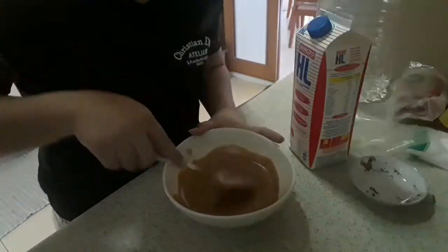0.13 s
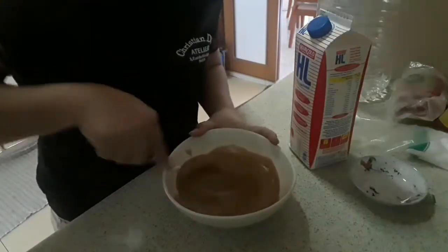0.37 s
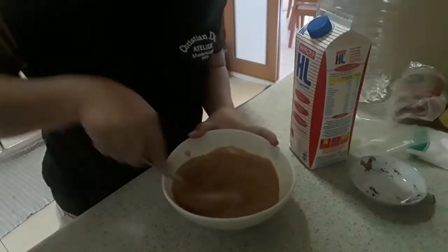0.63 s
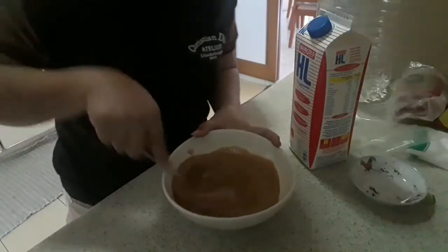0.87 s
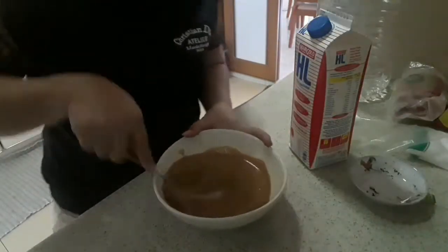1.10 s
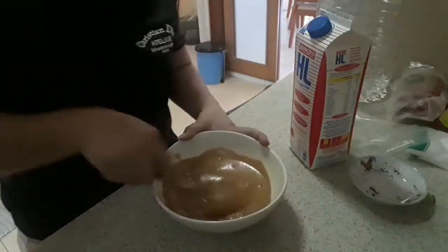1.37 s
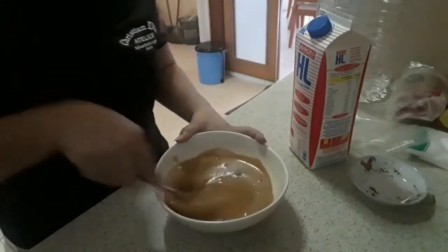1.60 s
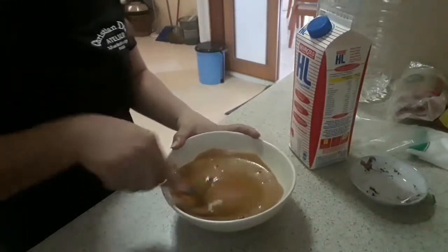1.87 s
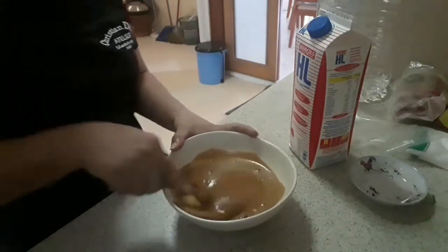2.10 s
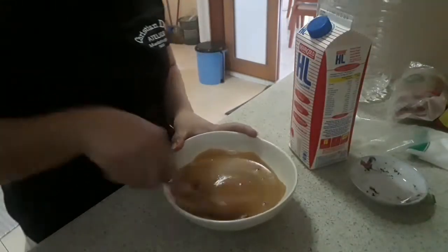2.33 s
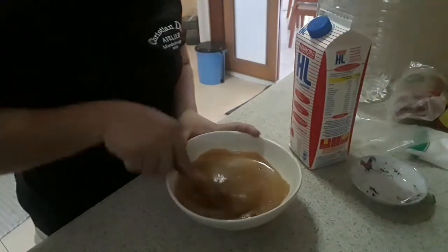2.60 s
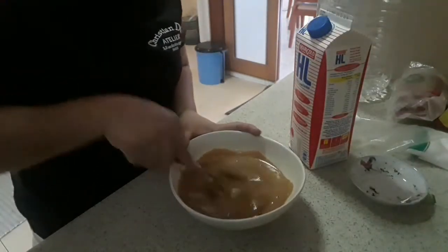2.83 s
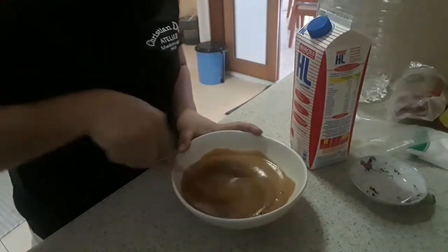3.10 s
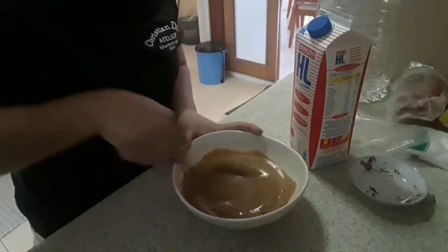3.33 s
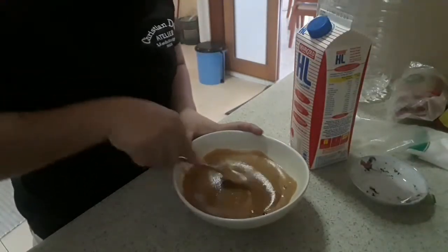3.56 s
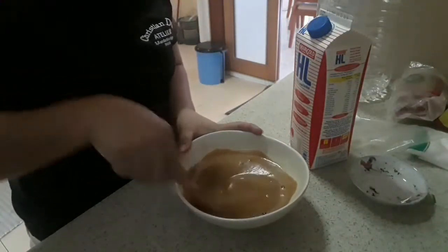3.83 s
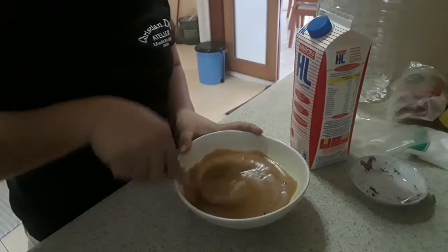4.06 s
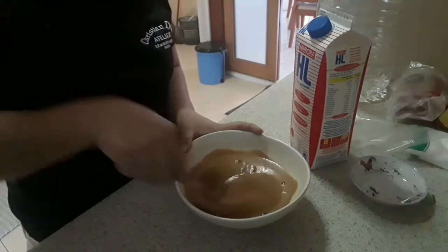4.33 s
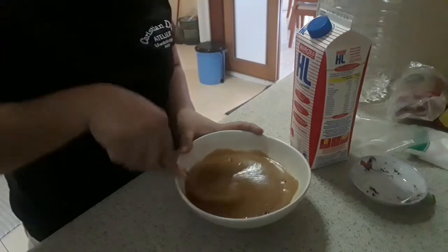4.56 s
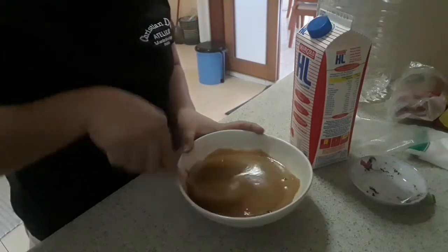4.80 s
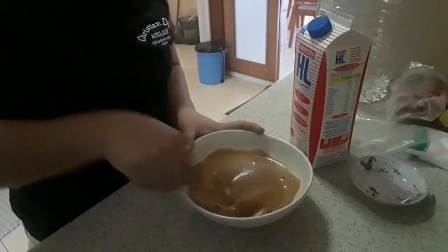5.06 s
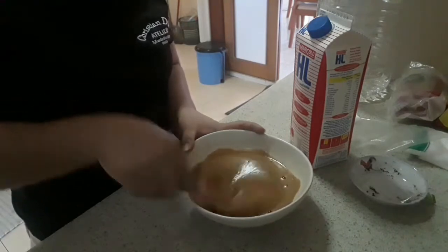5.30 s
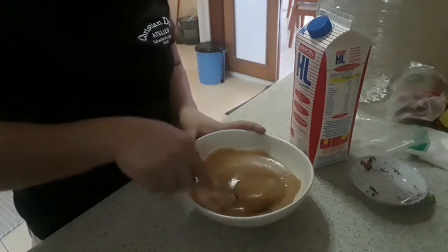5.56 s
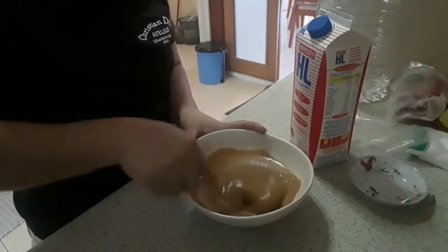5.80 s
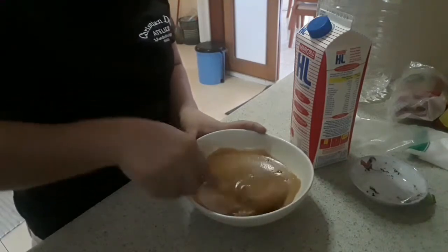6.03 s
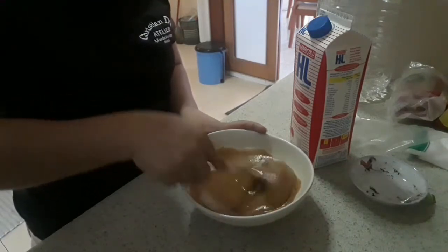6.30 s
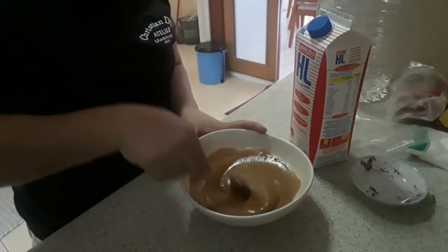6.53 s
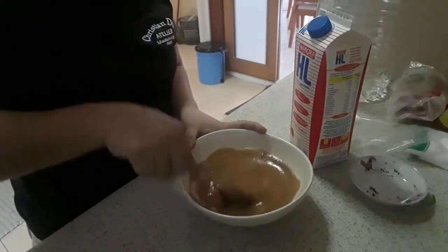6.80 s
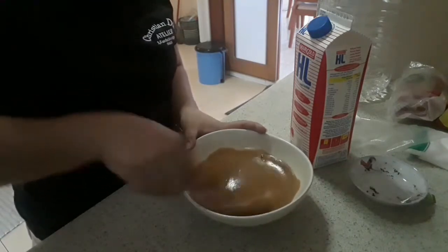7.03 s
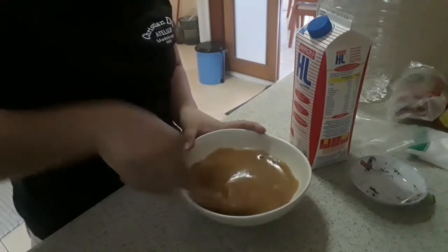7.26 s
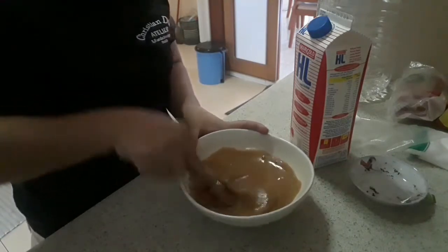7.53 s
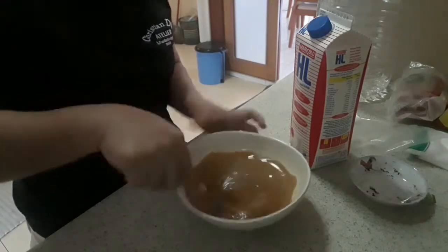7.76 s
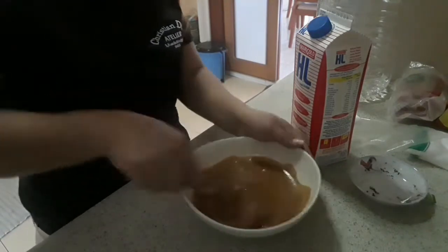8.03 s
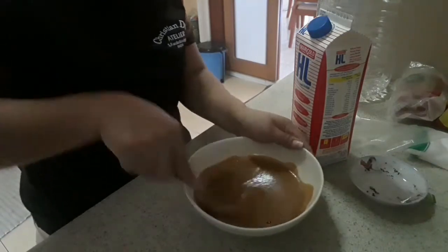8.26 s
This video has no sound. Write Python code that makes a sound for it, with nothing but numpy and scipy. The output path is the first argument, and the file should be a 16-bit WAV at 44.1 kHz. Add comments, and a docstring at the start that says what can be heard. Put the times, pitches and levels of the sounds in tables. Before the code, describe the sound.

After a short opening clatter, a spoon briskly scrapes and knocks around a ceramic bowl of batter, with a few harder clacks among soft wet turns.

```python
"""Beating batter in a ceramic bowl

Kitchen counter, one microphone, room echo 12 dB under the direct sound, treble ending near 15.5 kHz.
A metal spoon scrapes about two short strokes along the glaze in each turn, then thumps the bowl;
now and then bare metal clinks on the rim. Blows and gritty friction drive one set of damped modes,
and shaped noise adds dry cracks and the wash of batter. An opening clatter fades before the beating."""
import sys
import numpy as np
from scipy import signal
from scipy.io import wavfile
from scipy.ndimage import uniform_filter1d

SR = 44100
rng = np.random.default_rng(int(sys.argv[2]) if len(sys.argv) > 2 else 0)


def materialize(psi):
    """Save the field psi as 16-bit PCM at rate SR to the path in sys.argv[1].

    A 1-D psi becomes a single channel; in a 2-D psi each row is a channel.
    """
    bounded = np.clip(np.atleast_2d(psi).T, -1, 1)
    quanta = np.round(bounded * 32767).astype(np.int16)
    wavfile.write(sys.argv[1], SR, quanta)


def decibels_to_gain(level_db):
    """Convert a level in decibels to a linear amplitude gain (20 dB per decade)."""
    exponent = np.asarray(level_db, float) / 20
    return 10 ** exponent


N = 369905  # length in samples

# ring of bowl, spoon and counter: pitch_hz, width_hz, thump_db, stroke_db, clink_db (level under each contact)
RING_MODES = [(86, 110, -37, -32, -50), (164, 16.6, -9, -8, -42), (231.2, 27.5, 4.5, -9.5, -18),
              (316, 67, 4.5, -50, -35), (546, 29, -5.5, -31, -21), (592, 79, -5, -31, -4),
              (814, 103, 3.5, -45, -27), (979, 107, 3, -49, -11.5), (1176, 77, -4, -48, -6.5),
              (1426, 20, -11, -14, -26), (1470, 90, -8.5, -2.5, -9), (1627, 117, 0, -8, -34),
              (1957, 144, -0.5, -13, -15), (2224, 196, -9, -2, -44), (2388, 160, -2.5, -0.5, -5),
              (2740, 76, -7, -8.5, -12.5), (3056, 53, -16, -8, -15), (3514, 170, -13, -2.5, -10),
              (4400, 950, -53, -11.5, -3.5), (4820, 164, -16, -3.5, -5.5), (5370, 1360, -53, -4.5, -63),
              (6024, 440, -52, -6.5, -2.5), (6720, 330, 1.5, -13.5, -10.5), (7400, 270, -20, -15.5, -59),
              (7610, 110, -40, -20.5, -50), (7780, 86, -36, -15, -50), (8180, 69, -40, -18, -50),
              (8330, 67, -40, -27.5, -50), (7950, 300, -12, -21.5, -25), (9500, 160, -42, -48, -63),
              (9830, 630, -47.5, -22, -7.5), (12250, 960, -50, -17, -14), (13900, 1000, -55, -56, -13),
              (15770, 810, -55, -14, -20)]
# turns of the spoon, each ending in a thump through the batter: time_s, level_db, hardness_db (over 900 Hz)
SPOON_TURNS = [(0.266, -31, -16), (0.353, -27, -40), (0.474, -34.5, -28), (0.606, -34, -15),
               (0.716, -37.5, -7.5), (0.846, -39, -20), (0.94, -12.5, -10), (1.046, -45, -6),
               (1.192, -57.5, -6), (1.314, -50, 1), (1.415, -34.5, -16), (1.519, -36.5, -3),
               (1.67, -50, -18), (1.792, -50, -5), (1.914, -35, -26), (2.012, -32, -10), (2.126, -35.5, -7),
               (2.2712, -12.5, -3), (2.403, -25.5, -11), (2.528, -37, -19), (2.641, -38, -6),
               (2.752, -32, -27), (2.851, -36, -20.5), (2.975, -33, -16), (3.102, -35, -28),
               (3.215, -26, -3), (3.332, -22.5, -1), (3.442, -34.5, -20), (3.569, -30, -17),
               (3.681, -28.5, -4), (3.808, -36, -30), (3.909, -29, -31), (4.054, -42, -12),
               (4.157, -33, -22), (4.288, -33, -14), (4.384, -42, -18), (4.517, -25, -3.5),
               (4.659, -38, -22), (4.769, -33.5, -2), (4.887, -30, -11), (5.01, -26.5, -4),
               (5.148, -40.5, -13), (5.248, -35.5, -14), (5.352, -33, -19.5), (5.477, -38, -22),
               (5.605, -36, -13), (5.729, -32, -29), (5.847, -24, -5), (5.961, -27.5, -13),
               (6.077, -21.5, -13), (6.202, -31.5, -33), (6.318, -42.5, -8), (6.447, -36.5, -2.5),
               (6.551, -27.5, -8), (6.707, -20, -1.5), (6.825, -21.5, -1), (6.947, -27.5, -6.5),
               (7.077, -45, -24), (7.198, -47, -6), (7.332, -35.5, -15), (7.447, -21, -0.5),
               (7.575, -14.5, 0), (7.699, -19, -3), (7.831, -39, -7), (7.968, -34, -4), (8.085, -42, -20),
               (8.361, -37, -20)]
# further thumps of the spoon on the bowl, some doubling a turn's thump:
# time_s, level_db, boom_db (under 350 Hz), hardness_db (over 900 Hz)
FURTHER_THUMPS = [(0.023, -12, -13.5, -19.5), (1.435, -35, -12, -24), (1.572, -37, -31, -25),
                  (1.686, -30.5, -30, -32), (1.946, -34, -36, -22), (2.19, -31.5, -33, -28),
                  (2.263, -28, -22, 0), (2.369, -31.5, -3.5, -6), (5.175, -35.5, -28, -25),
                  (7.13, -32, -40, -25), (7.58, -22.5, -7.5, -16), (7.694, -34.5, -18, -11),
                  (7.704, -26, -1.5, -5), (7.739, -30.5, -21, -7.5), (7.983, -19.5, -36, -29),
                  (7.995, -26, -14, -16), (8.065, -7.5, -47, -12), (8.247, -28.5, -23, -10.5)]
# strokes of the edge along the glaze: time_s, level_db, brightness_db_per_octave, length_s (before scaling)
GLAZE_STROKES = [(0.041, -32, 15, 0.037), (0.066, -34, 3.5, 0.094), (0.293, -27, 1, 0.039),
                 (0.357, -41, 8, 0.024), (0.42, -39, -3, 0.037), (0.47, -39, 9, 0.039),
                 (0.53, -39, 0.6, 0.03), (0.583, -35.5, 11, 0.039), (0.642, -37, -1, 0.048),
                 (0.701, -32.5, 5.6, 0.028), (0.763, -30.5, 1.3, 0.033), (0.825, -37, 4, 0.028),
                 (0.888, -33.5, 1.5, 0.027), (0.937, -37, 6, 0.026), (0.976, -39, 8, 0.02),
                 (1.003, -37, -3, 0.038), (1.05, -45, 8, 0.028), (1.137, -39.5, -6, 0.026),
                 (1.189, -38, -1, 0.038), (1.241, -40, -3.5, 0.033), (1.296, -42.5, 15, 0.033),
                 (1.348, -43.5, -2, 0.054), (1.415, -44, 13, 0.037), (1.477, -39, 2, 0.042),
                 (1.541, -36, 6, 0.032), (1.614, -35, -2, 0.021), (1.667, -36.5, 6, 0.039),
                 (1.718, -39.5, 0, 0.053), (1.78, -37.5, 5.5, 0.045), (1.914, -43, 3, 0.027),
                 (1.988, -44.0, -6.5, 0.018), (2.031, -35, 0, 0.04), (2.099, -38, 1, 0.03),
                 (2.154, -30, 7.5, 0.026), (2.347, -36, -3, 0.031), (2.395, -33.5, 9.5, 0.033),
                 (2.455, -30, 4.3, 0.025), (2.509, -38.0, 8, 0.031), (2.576, -40.0, 2, 0.027),
                 (2.629, -35.5, 7, 0.029), (2.7, -41, -1, 0.022), (2.747, -40, 14, 0.034),
                 (2.81, -37, -3, 0.033), (2.867, -40.5, 13, 0.024), (2.922, -42, 1, 0.041),
                 (2.969, -41.5, 11, 0.044), (3.043, -36, 1.4, 0.033), (3.093, -40.5, 12, 0.038),
                 (3.148, -41.5, -5.5, 0.049), (3.215, -37, 7, 0.032), (3.274, -38, 0, 0.04),
                 (3.33, -48, 5, 0.037), (3.398, -41, -3, 0.036), (3.45, -36.5, 9, 0.03),
                 (3.522, -43, 0.3, 0.027), (3.568, -43.5, 9, 0.045), (3.641, -37, -1, 0.039),
                 (3.752, -42.0, 0.5, 0.03), (3.809, -41.5, 11, 0.026), (3.854, -41.5, 1, 0.04),
                 (3.904, -43, 7, 0.047), (3.99, -37.5, -3, 0.03), (4.036, -39.5, 1, 0.064),
                 (4.104, -38, -1.1, 0.036), (4.16, -54, 7, 0.034), (4.225, -42, -5.5, 0.026),
                 (4.29, -42, 11, 0.024), (4.341, -38.5, -1, 0.033), (4.406, -35, 7, 0.021),
                 (4.46, -38.0, 1, 0.041), (4.527, -40, 8, 0.034), (4.586, -40.5, 0, 0.045),
                 (4.653, -35.5, 7.5, 0.028), (4.714, -41.0, 3.5, 0.036), (4.775, -39.5, 7, 0.029),
                 (4.841, -43, -7, 0.049), (4.905, -39.5, 2, 0.035), (4.967, -39, 1, 0.033),
                 (5.025, -36, 6, 0.027), (5.085, -52, -4, 0.03), (5.143, -52, 12, 0.032),
                 (5.214, -55.5, 2.1, 0.018), (5.248, -50, 11.5, 0.031), (5.292, -42, -9, 0.012),
                 (5.334, -38, 1, 0.057), (5.431, -39, 4, 0.033), (5.482, -43, 12, 0.046),
                 (5.555, -45.5, -5.5, 0.028), (5.61, -47, 17, 0.028), (5.683, -44.0, 2.8, 0.015),
                 (5.732, -44.5, 10, 0.025), (5.792, -38, 1, 0.033), (5.843, -40, 7, 0.041),
                 (5.916, -38.5, -4, 0.026), (5.958, -35.5, 6.5, 0.027), (6.034, -38, -0.8, 0.029),
                 (6.073, -39, 14, 0.034), (6.148, -38.5, -6, 0.047), (6.199, -45, 14, 0.057),
                 (6.27, -37.0, -2, 0.052), (6.325, -42, 6, 0.053), (6.379, -30.5, 0.7, 0.052),
                 (6.478, -39, -5, 0.033), (6.511, -32, -1, 0.046), (6.573, -40.5, 5.8, 0.013),
                 (6.6, -33.5, -1.5, 0.039), (6.655, -32.0, 6, 0.042), (6.737, -35, 0, 0.03),
                 (6.79, -37.5, 13, 0.034), (6.875, -41, 8, 0.041), (6.955, -46, 8, 0.033),
                 (7.043, -44, -2.5, 0.039), (7.11, -42, -3.6, 0.048), (7.19, -41, 1, 0.066),
                 (7.286, -48.5, -6, 0.041), (7.33, -47, 6.3, 0.032), (7.418, -45.5, -6, 0.026),
                 (7.452, -46.5, 5, 0.034), (7.553, -42, 8, 0.054), (7.648, -45, -6, 0.026),
                 (7.761, -44.5, -3, 0.042), (7.859, -41.5, 0, 0.033), (7.948, -47, 13, 0.053),
                 (8.024, -36.5, -1, 0.1), (8.162, -45, -3, 0.042), (8.22, -44, 6, 0.042),
                 (8.302, -46, -8, 0.023), (8.348, -40, 4, 0.03)]
# the edge catches and squeaks high: start_s, level_db, pitch_hz, length_s (before scaling)
EDGE_SQUEAKS = [(6.649, -43, 7300, 0.024), (6.73, -26.5, 7200, 0.028), (6.807, -37, 7260, 0.019),
                (6.869, -29, 7400, 0.026), (6.917, -37, 7400, 0.013)]
# bare metal on the rim: start_s, level_db, brightness_db_per_octave, rattle_s (decay of the rebounds)
RIM_CLINKS = [(0.0227, -15, 2, 0.0036), (0.265, -27, 0.5, 0.0028), (2.132, -26, 4, 0.0039),
              (2.236, -20, 4.5, 0.0034), (3.183, -34.5, -1, 0.0069), (6.6818, -33.5, -2, 0.0056),
              (7.5375, -26, 2, 0.0099), (8.0506, -21.5, 4, 0.0044)]
# relative colour of the churning batter: pitch_hz, density_db (per Hz)
BATTER_COLOUR = [(24, -45), (40, 0.5), (224, -4), (423, -15), (539, 7), (727, -5.5), (1430, -5),
                 (1780, -12), (2320, -28.5), (2850, -21.5), (3500, -30), (4550, -25), (7700, -120)]
# kitchen echo: pitch_hz, t60_s
ECHO_TIMES = [(150, 0.13), (600, 0.24), (2500, 0.21), (8000, 0.13)]
# overall treble colour, with the upper cutoff at 15.5 kHz: pitch_hz, level_db
TREBLE_COLOUR = [(8500, -0.5), (9100, -7), (11100, -6.5), (12200, 1), (13300, -15.5), (15000, 1),
                 (15400, -7), (15520, -60)]
# level of everything: the opening fades, the beating comes in abruptly, one dip near the end: time_s, level_db
LEVEL_CURVE = [(0, -10), (.021, -2.5), (.14, 2), (.2, -9.5), (.25, -24), (0.263, -21), (0.266, -3),
               (7.885, 0), (7.9, -5.5), (7.945, -4), (7.96, -0.5), (8.4, 1.5)]

ECHO_DB = -12
# drag through the batter amid strokes of -39.5 dB, and how far it follows their strength
DRAG_DB, DRAG_SHARE = -49, 0.37
# churning at rest; thumps over -30 dB stir it up, the surge dying with this time constant
SLOSH_DB, SURGE_PER_DB, SURGE_S = -49.5, 0.2734, 0.079
# how far, how soon and how late the batter settles after a blow
SETTLE_DB, SETTLE_S, SETTLE_BEND = -3.5, 0.073, 1.23
# the counter's boom lags behind stronger thumps and grows with hardness, which counts from a floor
BOOM_DB, BOOM_PER_DB, BOOM_PER_HARD_DB, CUSHIONED_DB = -5.5, -0.3153, 0.39, -8.5
BOOM_LAG_S = 0.00299  # the counter answers a moment after the bowl
BEND, GULP = 0.022, 0.1  # pitch shares: a turn bends all modes, and slides the low ones up or down
# dry crack of a blow: level before its band filter, decay, band
CRACK_DB, CRACK_S, CRACK_HZ = -7, 0.0055, (500, 3640)


def bowl():
    """All contacts drive the same damped modes, which drift as batter and hand shift on the wall."""
    hz, width, thump_db, stroke_db, clink_db = np.transpose(RING_MODES)
    drive = thumps(hz, thump_db) + clinks(hz, clink_db) + strokes(hz, width, stroke_db)
    knots = np.arange(0, N + 650, 650)
    turns = np.interp(knots / SR, np.transpose(SPOON_TURNS)[0], np.arange(len(SPOON_TURNS)))
    # the spoon's travel bends all modes together, and each wanders a little alone
    sweep = BEND * np.sin(2 * np.pi * turns) + 0.017 * rng.standard_normal(len(knots))
    alone = 0.014 * rng.standard_normal((len(knots), len(hz)))
    drift = (sweep[:, None] + alone) * np.minimum(3600 / hz, 1)
    # each turn slides the low modes its own way
    slope = rng.standard_normal(len(SPOON_TURNS)).clip(-1.5, 1.5)[turns.astype(int)]
    drift += np.outer(GULP * slope * np.sin(np.pi * turns) ** 2, np.clip(1 - hz / 1100, 0, 1))
    out = np.zeros(N)
    for f, w, force, wander in zip(hz, width, drive, 1 + drift.T):
        phase = 2 * np.pi * f * np.cumsum(np.interp(np.arange(N), knots, wander)) / SR
        carrier = np.exp(1j * phase)
        envelope = signal.lfilter([1], [1, -np.exp(-np.pi * w / SR)], force * carrier.conj())
        out += (carrier * envelope).imag
    return out


def thumps(hz, ring_db):
    """Dull blows: hard ones reach the upper modes, flat ones wake the counter's boom."""
    rows, drive = blows(), np.zeros((len(hz), N))
    spots = spot(2.5, count=len(rows))
    draws = rng.random((len(rows), len(hz) + 1, 24))
    high, low = np.clip(np.log2(hz / 620) / 0.46, 0, 1), hz < 350
    for (s, db, boom_db, hard_db), draw, where in zip(rows, draws, spots):
        # light blows sink in slowly, wobble longer and rebound more strongly
        light = np.clip((-18 - db) / 18, 0, 1)
        force = rattle(.008 + 0.01098 * light, draw, -5 + 8 * light, 0.00028 + 0.00063 * light)
        # rebounds neither cancel nor pile up fully in any one mode
        waves = np.exp(-2j * np.pi * np.outer(hz, np.arange(force.shape[1])) / SR)
        piled = abs((force * waves).sum(1))
        evening = (np.sqrt(np.mean(piled ** 2)) / (piled + 1e-9)) ** .7
        force = force * evening.clip(.4, 1.7)[:, None]
        force[low] = np.roll(force[low], round(BOOM_LAG_S * SR), axis=1)
        level = where * decibels_to_gain(db + ring_db + low * boom_db + high * hard_db)
        add(drive, s + 0.00117, level[:, None] * force)
    return drive + plops(hz, ring_db - 9 * high)


def blows():
    """All dull blows in time order, turns and further thumps: time_s, level_db, boom_db, hardness_db."""
    rows = list(FURTHER_THUMPS)
    for s, db, hard_db in SPOON_TURNS:
        boom_db = BOOM_DB + BOOM_PER_DB * (db + 25.5) + BOOM_PER_HARD_DB * max(hard_db, CUSHIONED_DB)
        rows.append((s, db, boom_db, hard_db))
    return sorted(rows)


def strokes(hz, width, ring_db):
    """Gritty friction: strokes and squeaks on top of the spoon's unbroken drag."""
    drag_db = DRAG_DB + DRAG_SHARE * (pressure_db(np.arange(N) / SR) + 39.5)
    pressure = np.outer(decibels_to_gain(ring_db - 1.4 * np.log2(hz / 4500)), decibels_to_gain(drag_db))
    octaves = np.log2(hz / 4500).clip(-1.5, 1.2)
    # the dragging edge wanders, so each mode swells and fades on its own
    wander = uniform_filter1d(rng.standard_normal((N // 64 + 1, len(hz))), size=16, axis=0)
    pressure *= decibels_to_gain(12 * wander.T).repeat(64, axis=1)[:, :N]
    count = len(GLAZE_STROKES)
    spots, rises = abs(spot(3.36, count=count)), rng.uniform(0.34, 0.71, count)
    for (s, db, tilt_db, length), where, rise in zip(GLAZE_STROKES, spots, rises):
        level = where * decibels_to_gain(db + ring_db + tilt_db * octaves)
        add(pressure, s - .007, np.outer(level, slide(length, rise)))
    for s, db, squeak_hz, length in EDGE_SQUEAKS:
        level = decibels_to_gain(db) * np.exp(-((hz - squeak_hz) / 500) ** 2)
        add(pressure, s, np.outer(level, slide(length, 0.6)))
    grit = rng.standard_normal(N) * decibels_to_gain(1.8 * rng.exponential(1, N).clip(0, 5))
    grit *= decibels_to_gain(29 * uniform_filter1d(rng.standard_normal(N), size=150))  # the edge judders over the glaze
    # a narrow mode gathers noise longer, so it needs less force for the same level
    return pressure * grit / grit.std() * np.sqrt(4 * np.pi * width / SR)[:, None] * decibels_to_gain(-16)


def pressure_db(t):
    """The edge's pressure at times t: the strength of the strokes nearby."""
    s, db = np.transpose(GLAZE_STROKES)[:2]
    return np.interp(t, s, uniform_filter1d(db, size=3))


def slide(length, rise):
    """Pressure of one slide: it bites, then lets go."""
    u = np.linspace(0, 1, round(1.354 * np.clip(length, .008, .12) * SR))
    bite = np.sin(np.pi / 2 * np.minimum(u / rise, 1)) ** 2
    return bite * np.cos(np.pi / 2 * u ** 1.325) ** 2


def clinks(hz, ring_db):
    """Sharp metal blows that skip and chatter on the glaze."""
    drive, spots = np.zeros((len(hz), N)), spot(2.5, count=len(RIM_CLINKS))
    draws = rng.random((len(RIM_CLINKS), len(hz) + 1, 24))
    octaves = np.log2(hz / 3000).clip(-2, 1)
    for (s, db, tilt_db, length), draw, where in zip(RIM_CLINKS, draws, spots):
        force = rattle(max(length, 1e-3), draw, -1.1, 0)
        add(drive, s, (where * decibels_to_gain(db + ring_db + tilt_db * octaves))[:, None] * force)
    return drive


def cracks():
    """The dry, dense crack at the front of each blow, too damped to ring; hard blows have more of it."""
    rows, t, out = blows(), np.arange(round(.03 * SR)) / SR, np.zeros((1, N))
    shape = np.minimum(t / 0.0013, 1) * np.exp(-t / CRACK_S)
    for (s, db, _, hard_db), burst in zip(rows, rng.standard_normal((len(rows), len(t)))):
        add(out, s + 0.001203, decibels_to_gain(db + hard_db + CRACK_DB) * (shape * burst)[None])
    return signal.sosfilt(signal.butter(2, CRACK_HZ, "band", fs=SR, output="sos"), out[0])


def rattle(length, draw, later_db, contact):
    """A blow and a cluster of dying rebounds, each a soft push set by the contact time in seconds."""
    when, size = draw[0], draw[1:]
    force = np.zeros((len(size), round(.12 * SR)))
    delay = np.clip(2.5 * length * when, 0, .1)
    # every rebound has its own sign and strength in each mode
    force[:, (delay * SR).astype(int) + 1] = decibels_to_gain(later_db) * (2 * size - 1) * np.exp(-delay / length)
    force[:, 0] = 0.89
    push = signal.windows.hann(round(contact * SR) + 3)
    return signal.lfilter(push / push.sum(), 1, force)


def spot(scatter_db, count):
    """Each contact lands elsewhere, so every mode gets its own sign and strength."""
    draw = rng.standard_normal((count, len(RING_MODES), 2))
    return np.sign(draw[..., 0]) * decibels_to_gain(scatter_db * draw[..., 1].clip(-1.7, 1.7))


def add(drive, s, force):
    """Adds a modes x time force at time s in seconds."""
    part = drive[:, max(round(s * SR), 0):][:, :force.shape[1]]
    part += force[:, :part.shape[1]]


def plops(hz, ring_db):
    """Batter folds and slaps the wall at random, each slap waking the modes very unevenly."""
    count = 600
    at, size = rng.integers(0, N, count), rng.exponential(1, count).clip(0, 3)
    drive = np.zeros((len(hz), N))
    drive[:, at] = decibels_to_gain(-10 + 3.14 * size) * slosh()[at] * (decibels_to_gain(ring_db) * spot(5.9, count=count)).T
    push = signal.windows.hann(25)
    return signal.lfilter(push / push.sum(), 1, drive)


def churn():
    """The soft wash of moving batter: random short-time spectra with drifting patches."""
    frames, hz = N // 128 + 5, np.fft.rfftfreq(512, 1 / SR)
    a, b, patches = rng.standard_normal((frames, 257, 3)).T
    patches = uniform_filter1d(uniform_filter1d(patches, size=7, axis=0), size=10, axis=1)
    z = (a + 1j * b) * decibels_to_gain(read(BATTER_COLOUR, hz)[:, None] + 3 * patches / patches.std())
    x = signal.istft(z, nperseg=512, noverlap=384)[1][:N]
    return slosh() * x / x.std()


def slosh():
    """Gain of the batter's motion: it surges with strong blows and settles from each to the next."""
    t = np.arange(N) / SR
    # a faint blow ahead of the start gives the first samples something to settle from
    beats, strength_db = np.transpose([(-1, -60)] + [row[:2] for row in blows()])
    since = t - beats[np.searchsorted(beats, t) - 1]
    settle_db = SETTLE_DB * np.clip(since / SETTLE_S, 0, 1) ** SETTLE_BEND
    surge_db = sum(SURGE_PER_DB * (db + 34.5) * (t > s) * np.exp(-abs(t - s) / SURGE_S)
                   for s, db in zip(beats, strength_db) if db > -30)
    return decibels_to_gain(SLOSH_DB + uniform_filter1d(settle_db + surge_db, size=300))


def kitchen(x):
    """Room echo: sparse taps of random sign, each band dying at its own speed."""
    taps = np.zeros(SR // 2)
    at = np.arange(200, len(taps) - 20, 20)
    taps[at + rng.integers(0, 20, len(at))] = rng.choice([-1., 1.], len(at))
    hz, t, z = signal.stft(taps, SR, nperseg=256)
    decay = decibels_to_gain(-60 * t / read(ECHO_TIMES, hz).clip(.03)[:, None])
    tail = signal.istft(z * decay, SR, nperseg=256)[1]
    return signal.fftconvolve(x, tail / np.linalg.norm(tail))[:N]


def read(points, hz):
    """Reads a spectrum on a log-frequency axis."""
    f, value = np.transpose(points)
    return np.interp(np.log(hz + 1), np.log(f + 1), value)


def scene():
    """Bowl and cracks, their kitchen echo, and the batter's wash."""
    dry = bowl() + cracks()
    return (dry + decibels_to_gain(ECHO_DB) * kitchen(dry) + churn())[None]


def low_pass(x):
    """Removes everything above the highest recorded frequency."""
    return signal.sosfilt(signal.butter(12, 16480, fs=SR, output="sos"), x)


def record(dry):
    """Microphone hiss, low cut and treble colour, then the level curve over everything."""
    hiss = decibels_to_gain(-67.5) * rng.standard_normal(dry.shape)  # the capsule's own noise
    low_cut = signal.butter(3, 70, "high", fs=SR, output="sos")
    band = signal.sosfilt(low_cut, dry + hiss)
    hz = np.linspace(0, SR / 2, 513)
    colour = signal.firwin2(401, hz, decibels_to_gain(read(TREBLE_COLOUR, hz)), fs=SR, window=("kaiser", 7))
    band = signal.oaconvolve(band, colour[None], "same")
    s, db = np.transpose(LEVEL_CURVE)
    mix = band * decibels_to_gain(np.interp(np.arange(N) / SR, s, db))
    return low_pass(mix)


dry = scene()
out = record(dry)
materialize(out)
```